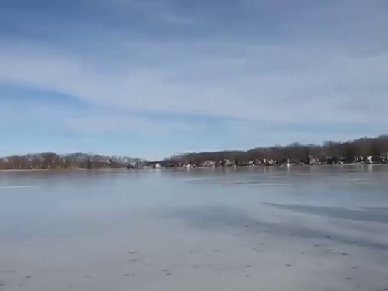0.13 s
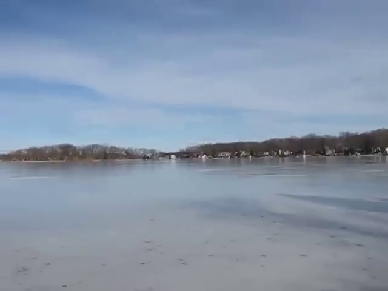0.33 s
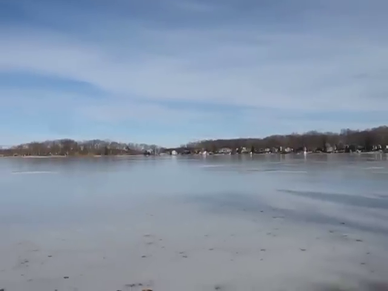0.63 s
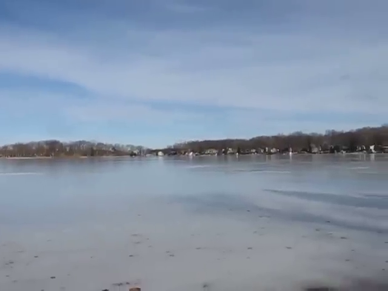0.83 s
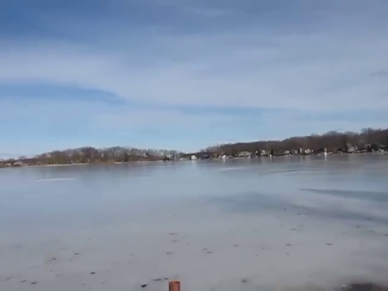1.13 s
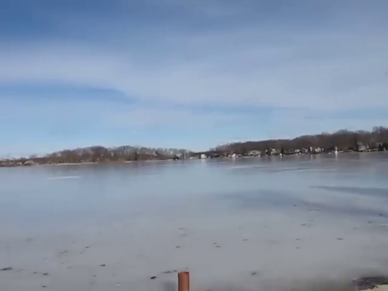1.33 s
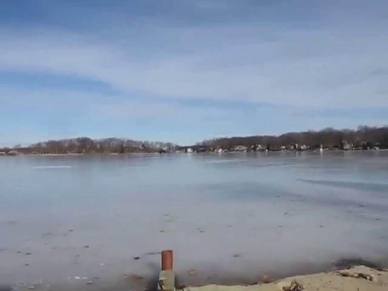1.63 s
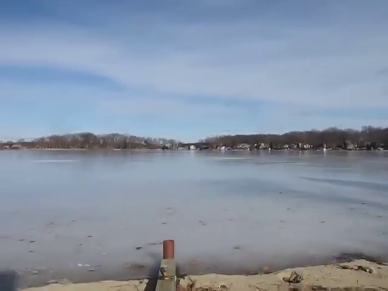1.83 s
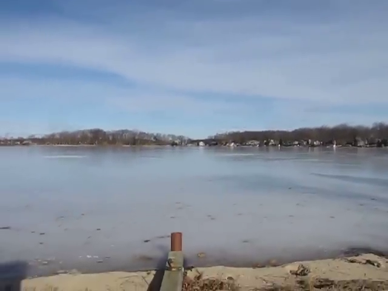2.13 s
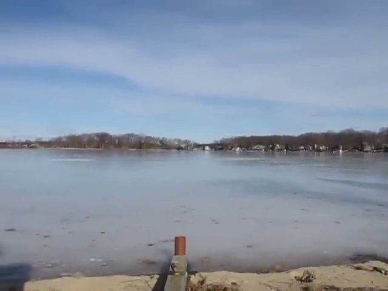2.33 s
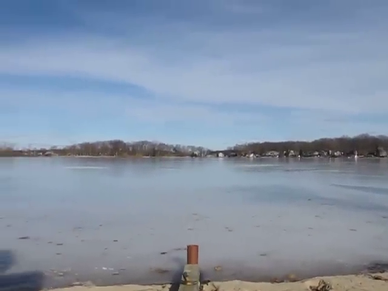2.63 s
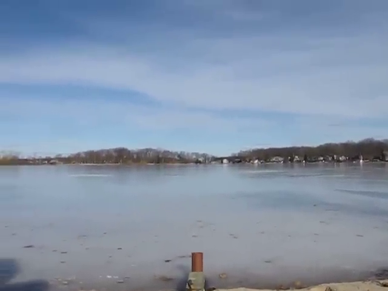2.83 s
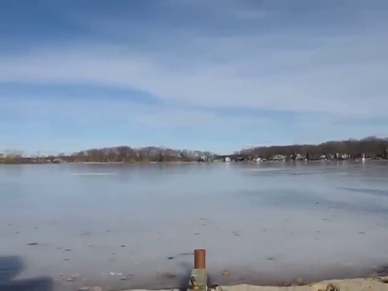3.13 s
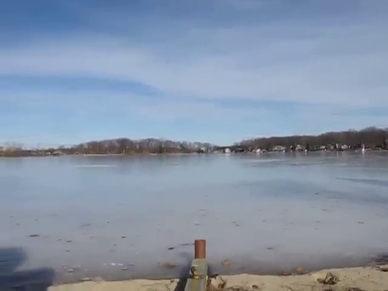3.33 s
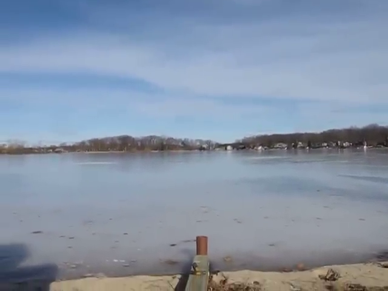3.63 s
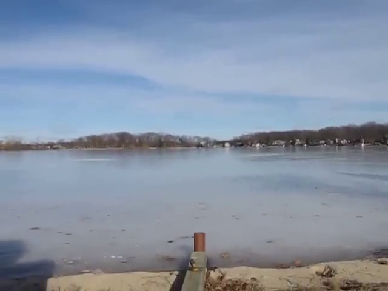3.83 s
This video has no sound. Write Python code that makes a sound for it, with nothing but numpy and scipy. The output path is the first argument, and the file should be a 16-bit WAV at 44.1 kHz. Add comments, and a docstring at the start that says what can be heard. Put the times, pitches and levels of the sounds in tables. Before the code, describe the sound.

Low wind buffeting hits a handheld camera's microphone for a second, then faint handling clicks and creaks

```python
"""On a frozen lake shore a gust buffets the two ports of a hand-held camera while its lens motor whirs.
The body clicks once early on; the gust, turbulent noise, dies away after a second; the ice adds damped
ticks and tinkles. A sleeve rustles as shaped noise, and low gliding blips rise softly from the ice sheet;
past two seconds the grip creaks by stick-slip and the body clicks again. The motor stops after three
seconds, and far traffic swells at the end. Beneath it all lie open-air hush, hiss and an engine drone of
slightly wavering sines that slowly swells and fades."""
import sys
import numpy as np
from scipy import signal
from scipy.fft import rfft, irfft, next_fast_len
from scipy.io import wavfile
from scipy.ndimage import uniform_filter1d, map_coordinates

SR = 44100
rng = np.random.default_rng(int(sys.argv[2]) if len(sys.argv) > 2 else 0)


def wrap_up_sound(samples):
    """Save the sound to the file named by the first command line argument, as 16-bit audio."""
    columns = np.atleast_2d(samples).T
    # keep every value between -1 and 1, then stretch to whole-number steps
    tamed = np.clip(columns, -1, 1)
    steps = np.round(tamed * 32767).astype(np.int16)
    wavfile.write(sys.argv[1], SR, steps)


N = 176400  # samples: 4 s


def amp(db):
    """Level to amplitude: 20 dB is a factor of ten."""
    return 10 ** (np.asarray(db) / 20)


def unit(x):
    """Normalization: scale to an rms of 1 over all channels."""
    return x / np.sqrt(np.mean(x ** 2) + 1e-20)


def clock():
    """Sampling: the time of each sample [s]."""
    return np.arange(N) / SR


def sine(hz, t, phase=0):
    """Simple harmonic motion with an added phase [rad]."""
    return np.sin(2 * np.pi * hz * t + phase)


def along(points, hz):
    """Interpolation of (frequency [Hz], value) points on a logarithmic frequency axis."""
    f, v = np.transpose(points)
    return np.interp(np.log(hz + 1), np.log(f + 1), v)


def curve(points):
    """Linear interpolation of (time [s], value) points, one value per sample."""
    return np.interp(clock(), *np.transpose(points))


def wobble(rate):
    """Band-limited fluctuation: a smooth random curve with rate knots a second."""
    return map_coordinates(rng.standard_normal(8192), [clock() * rate + 4], mode="wrap")


def filtered(x, response):
    """Linear filtering: multiply the spectrum by a response of frequency."""
    m = next_fast_len(N + 8192)
    hz = np.fft.rfftfreq(m, 1 / SR)
    return irfft(rfft(x, m) * response(hz), m)[..., :N]


def rush(spectrum, alike):
    """Partly coherent stereo noise of rms 1; alike is a coherence or (frequency [Hz], coherence) points."""
    def mid_side_gains(hz):
        coherence = along(alike, hz) if np.ndim(alike) else alike + 0 * hz
        angle = np.arccos(np.clip(coherence, -1, 1)) / 2
        return amp(along(spectrum, hz)) * [np.cos(angle), np.sin(angle)]

    mid, side = filtered(rng.standard_normal((2, N)), mid_side_gains)
    return unit(np.array([mid + side, mid - side]))


def band(hz, octaves):
    """Band-pass noise: independent channels around one frequency, joint rms 1."""
    def response(f):
        return 1 / (1 + (np.log2((f + 1) / hz) / octaves) ** 4)

    return unit(filtered(rng.standard_normal((2, N)), response))


def pan(db):
    """Interaural level difference: left and right gains, positive toward the left."""
    return amp([[db / 2], [-db / 2]])


def burst(s, hold, t60, attack=0.0008):
    """Transient envelope: exponential attack, hold, then a release of 60 dB in t60 seconds."""
    t = np.maximum(clock() - s, 0)
    release = np.log(1000) * np.maximum(t - hold, 0) / t60
    return (1 - np.exp(-t / attack)) * np.exp(-np.minimum(release, 40))


def swell(s, length):
    """Gaussian envelope around time s, with length as its standard deviation [s]."""
    return np.exp(-np.minimum(((clock() - s) / length) ** 2 / 2, 40))


def eddies(spectrum, steady_s):
    """Turbulence: noise incoherent between ports, its power evened out over about steady_s."""
    x = rush(spectrum, 0)
    width = max(int(steady_s * SR), 2)
    power = np.abs(signal.hilbert(x)) ** 2 / 2
    for _ in range(2):
        power = uniform_filter1d(power, width, axis=1)
    return unit(x / np.sqrt(np.abs(power) + 0.08))  # the floor keeps lulls from being overamplified


# wind strength at each port: (time [s], relative level [dB])
WIND_LEFT = [(0, -24), (.05, -24), (.09, -30.5), (.2, -26.5), (.29, -24), (.38, -17), (.43, -12),
             (.51, -15.5), (.56, -12), (.7, -16), (.77, -22), (.85, -20.5), (.96, -24), (1.01, -34),
             (1.1, -28), (1.18, -24.5), (1.22, -45), (1.3, -37), (1.45, -47), (4, -65)]
WIND_RIGHT = [(0, -23.5), (.1, -40), (.19, -36.5), (.35, -33.5), (.42, -22), (.52, -18.5), (.59, -20),
              (.66, -20.5), (.77, -21.5), (.91, -29.5), (.97, -28.5), (1.12, -32), (1.17, -49),
              (1.45, -54.5), (4, -60)]
# spectra of the low rumble and the higher flapping: (frequency [Hz], relative density [dB per Hz])
RUMBLE_SPECTRUM = [(15, -7.5), (35, 1.5), (60, 3), (100, -4.5), (150, -19), (250, -21.5), (400, -53),
                   (1000, -72), (3000, -84)]
FLAP_SPECTRUM = [(40, -26.5), (90, -3), (130, 0.5), (165, -0.5), (230, -11), (320, -15.5), (450, -26),
                 (700, -34.5), (1200, -48), (2500, -79), (6000, -83)]
# single buffets within the gust: (time [s], rumble change [dB], flapping change [dB])
BUFFETS = [(.235, 5, 0), (.357, 0, 5), (.41, 3, -2), (.443, 0, 5), (.55, 1, 4), (.6, 2, -4), (.652, 3, 1),
           (.71, 3, 2), (.745, 0, 11), (.8, 0, 9), (1.135, 4, 7)]
BUFFET_S = 0.012
RUMBLE_DB, FLAP_DB = -0.5, -4.5
FLAP_PIVOT_DB, FLAP_GROWTH = -13.5, 2.04  # growth in dB per dB of wind strength, about the pivot


def wind():
    """Nonlinear flow noise: flapping grows faster than rumble; each buffet reshapes one or both."""
    strength_db = np.array([curve(WIND_LEFT), curve(WIND_RIGHT)])
    rumble_change_db = sum(change * swell(s, BUFFET_S) for s, change, _ in BUFFETS)
    flap_change_db = sum(change * swell(s, BUFFET_S) for s, _, change in BUFFETS)
    flutter_db = 2.7 * np.array([wobble(110.3), wobble(109.6)])
    rumble_db = strength_db + rumble_change_db + RUMBLE_DB
    flap_db = FLAP_PIVOT_DB + FLAP_GROWTH * (strength_db - FLAP_PIVOT_DB)
    flap_db = flap_db + flap_change_db + flutter_db + FLAP_DB
    rumble = amp(rumble_db) * eddies(RUMBLE_SPECTRUM, steady_s=0.027)
    flapping = amp(flap_db) * eddies(FLAP_SPECTRUM, steady_s=0.029)
    return rumble + flapping


# running of the whir: (time [s], relative level [dB])
MOTOR_RUN = [(0, 1), (1.5, 1), (2.95, 1.5), (3.05, -8), (4, -46)]
# spectra of the whir and the gear chatter: (frequency [Hz], relative density [dB per Hz])
WHIR_SPECTRUM = [(150, -35), (350, 11.5), (460, -3), (700, 4.5), (1000, 0.5), (1350, -0.5), (1900, -15),
                 (3000, -20), (6000, -28), (15000, -55)]
CHATTER_SPECTRUM = [(1500, -24), (2700, -11), (3200, 5), (3900, -13), (5100, -2.5), (6500, -12),
                    (14000, -36)]
# chatter strength before modulation and panning: (time [s], level [dB])
CHATTER_LEVEL = [(0, -59.5), (.4, -69), (.8, -68), (1.05, -69.5), (1.3, -67), (2.2, -69.5), (3, -74),
                 (3.5, -71), (4, -81)]
# faint motor tones: (start [s], end of hold [s], frequency [Hz], mean level [dB])
MOTOR_TONES = [(-.1, 1.48, 657, -59.5), (.95, 2.3, 355.7, -57.5), (.95, 1.55, 386.6, -60)]
WHIR_DB = -56
CHATTER_HZ, CHATTER_PEAK_S, CHATTER_DEPTH = 22.65, 0.0085, 0.56


def lens_motor():
    """Amplitude modulation: rough whir and wavering tones, with gear chatter that swells once a turn."""
    t = clock()
    whir = amp(WHIR_DB + curve(MOTOR_RUN) + 2.5 * wobble(60)) * rush(WHIR_SPECTRUM, 0.79)
    turn = 1 + CHATTER_DEPTH * np.cos(2 * np.pi * CHATTER_HZ * (t - CHATTER_PEAK_S))
    # negative coherence: the two channels partly oppose each other
    chatter = amp(curve(CHATTER_LEVEL)) * turn * rush(CHATTER_SPECTRUM, -0.37) * pan(db=-4.5)
    tones = np.zeros(N)
    for start, end, hz, db in MOTOR_TONES:
        envelope = burst(start, end - start, t60=0.42, attack=0.019)
        tones += amp(db + 3.4 * wobble(3.1)) * envelope * sine(hz, t, 0.3 * wobble(16))
    return whir + chatter + tones


# slips of the grip:
# (time [s], relative level [dB], frequency [Hz], nominal length [s], grit level over the tone [dB])
CREAKS = [(2.2185, -43, 1570, .005, -12), (2.3105, -44, 1550, .004, -20), (2.3152, -31, 1680, .003, -28),
          (2.319, -33, 1620, .005, -26), (2.3265, -41, 1500, .002, -12), (2.336, -33, 1330, .005, -25),
          (2.3408, -35, 1400, .004, -12), (2.3478, -32, 1400, .003, -17), (2.3522, -30.5, 1520, .004, -23),
          (2.3586, -34, 1100, .003, -10), (2.3665, -42, 1400, .003, -22), (2.3708, -37, 1600, .003, -26),
          (2.3744, -33, 1550, .004, -27), (2.3815, -40, 1550, .002, -16), (2.428, -42, 1260, .004, -20),
          (2.4375, -42, 1600, .002, -14), (2.445, -44, 1550, .005, -22), (2.555, -39, 1560, .005, -24),
          (2.5615, -41, 1600, .004, -24), (2.655, -41, 1590, .005, -22), (2.674, -46, 1550, .004, -22),
          (2.7098, -41, 1540, .005, -22), (2.733, -45, 1500, .004, -22), (2.7485, -36, 1540, .005, -26),
          (2.7925, -42, 1520, .003, -22), (2.803, -38.5, 1530, .005, -24), (2.9505, -40, 1520, .005, -24),
          (2.973, -46, 1480, .005, -20)]
# dull body and bright crack of small solid knocks, also played by the ice,
# then the rattling case: (frequency [Hz], relative density [dB per Hz])
KNOCK_BODY = [(200, -8), (600, 6.5), (1000, 5), (1450, 0), (2100, -36), (6000, -56)]
KNOCK_CRACK = [(800, -20), (2000, 2), (3300, 6), (4500, -7), (7000, -16), (15000, -28)]
RATTLE_SPECTRUM = [(200, -12), (450, 2), (950, 3.5), (1300, 0), (1900, 4), (2600, -15), (3600, -21),
                   (4600, -29), (12000, -42)]
CREAK_DB, CREAK_KNOCK_DB, CREAK_PAN_DB = 0.5, -13, 2
CREAK_ATTACK_S, CREAK_T60_S, CREAK_HOLD = 0.0008, 0.007, 0.8  # hold: share of the nominal length
CREAK_ROUGH_RAD = 0.42  # scales the random phase
RATTLE_DB, RATTLE_T60_S = -23, 0.083


def creaks():
    """Stick-slip friction: each slip sings briefly near a resonance, with knock, grit and case rattle."""
    tone, grip, grit, rattle = np.zeros((4, N))
    for s, db, hz, length, grit_db in CREAKS:
        slip = burst(s, length * CREAK_HOLD, CREAK_T60_S, attack=CREAK_ATTACK_S)
        envelope = amp(db + CREAK_DB) * slip
        tone += envelope * sine(hz, clock() - s, CREAK_ROUGH_RAD * wobble(700))
        grip += envelope
        grit += amp(grit_db) * envelope
        rattle += amp(db + RATTLE_DB) * burst(s, 0, RATTLE_T60_S)
    rough_tone = tone * amp(0.72 * wobble(600))
    gritty = grit * rush(KNOCK_CRACK, 0.2)
    knock = amp(CREAK_KNOCK_DB) * grip * rush(KNOCK_BODY, 1.0)
    return (rough_tone + gritty + knock) * pan(db=CREAK_PAN_DB) + rattle * rush(RATTLE_SPECTRUM, 0.6)


# clicks of the camera body, levels before panning:
# (time [s], snap level [dB], thump level before doubling [dB], left over right [dB])
CLICKS = [(0.497, -45, -59, -2), (2.7178, -41.5, -28.5, -8.5), (2.825, -47.5, -48, -9.5)]
# bright snap: (frequency [Hz], relative density [dB per Hz])
SNAP_SPECTRUM = [(300, -4), (1000, 0), (2500, 2), (4500, -1.5), (7500, -8), (11000, -13.5), (15000, -14)]
SNAP_HOLD_S, SNAP_T60_S = 0.0035, 0.012
THUMP_HZ, THUMP_T60_S = 780, 0.0045


def clicks():
    """Impact excitation: a heavily damped sine thumps together with a short bright noise snap."""
    out, noise = np.zeros((2, N)), rush(SNAP_SPECTRUM, 0.041)
    for s, snap_db, thump_db, pan_db in CLICKS:
        thump_envelope = burst(s, 0, THUMP_T60_S, attack=0.0001)
        thump = 2 * amp(thump_db) * thump_envelope * sine(THUMP_HZ, clock() - s)
        snap = amp(snap_db) * burst(s, SNAP_HOLD_S, SNAP_T60_S) * noise
        out += pan(db=pan_db) * (thump + snap)
    return out


# cloth noise: (frequency [Hz], relative density [dB per Hz])
RUSTLE_SPECTRUM = [(300, -4), (1000, -3), (2000, -2), (4500, -1.5), (7000, -4.5), (11000, -10),
                   (15500, -15)]
# strength of the rustle: (time [s], mean level [dB])
RUSTLE_LEVEL = [(0, -74), (.8, -73), (1.02, -65), (1.45, -65), (1.65, -59.5), (1.87, -61), (2.05, -65.5),
                (2.2, -63.5), (2.55, -70.5), (3.1, -77), (4, -80)]
# quick brushes: (centre [s], standard deviation [s], level [dB], centre frequency [Hz], width [octaves])
BRUSHES = [(.678, .016, -52, 4200, .6), (.668, .022, -63, 10000, .5)]


def sleeve():
    """Friction noise: cloth gives a grainy wide-band rustle with a few quick band-pass brushes."""
    rustle = amp(curve(RUSTLE_LEVEL) + 1.4 * wobble(250)) * rush(RUSTLE_SPECTRUM, 0.056)
    brushes = sum(amp(db) * swell(s, length) * band(hz, octaves) for s, length, db, hz, octaves in BRUSHES)
    return rustle + brushes


# dry ticks: (time [s], knock level [dB], knock frequency [Hz], bright crack level [dB])
TICKS = [(.893, -46, 1250, -55), (1.04, -42, 1300, -55), (1.192, -38, 1300, -58), (1.529, -40, 1150, -54),
         (1.593, -37, 1050, -51), (1.599, -43, 1400, -46), (1.694, -36, 1050, -52), (1.756, -48, 1500, -47),
         (1.768, -37, 1050, -60), (1.891, -43, 1200, -60), (1.911, -40, 1000, -49), (2.091, -34, 1050, -54)]
# low blips of the sheet: (centre [s], standard deviation [s], level [dB], frequency at centre [Hz])
BLIPS = [(1.857, 0.056, -48, 257), (2.137, 0.065, -52, 271.6), (2.266, 0.072, -55.5, 259.4),
         (2.66, 0.042, -50.5, 214), (2.799, 0.04, -52.5, 265), (3.124, 0.051, -45, 262.6),
         (3.747, 0.057, -47.5, 272), (3.78, 0.032, -45.5, 212.3)]
# tiny high ticks of ice crystals: (time [s], level [dB], centre frequency [Hz])
TINKLES = [(1.223, -52, 10500), (1.378, -58, 9700), (1.697, -58, 6200), (2.98, -55, 5400),
           (3.414, -53, 9900)]
TICK_T60_S, TICK_RING_T60_S, TICK_SCUFF_DB = 0.026, 0.018, -2.5  # scuff level over the knock
BLIP_GLIDE_HZ_PER_S, BLIP_ROUGH_RAD = 123, 0.75
TINKLE_T60_S, TINKLE_OCTAVES = 0.032, 0.3


def ice():
    """Damped resonance and gliding tones: dry ticks and tinkles die fast; wavering low blips rise in pitch."""
    knock, scuff, crack, blips = np.zeros((4, N))
    for s, db, hz, crack_db in TICKS:
        knock += amp(db) * burst(s, 0, TICK_RING_T60_S) * sine(hz, clock() - s)
        envelope = burst(s, 0, TICK_T60_S, attack=0.00049)
        scuff += amp(db + TICK_SCUFF_DB) * envelope
        crack += amp(crack_db) * envelope
    for s, length, db, hz in BLIPS:
        t = clock() - s
        mean_hz = hz + BLIP_GLIDE_HZ_PER_S * t / 2  # half the glide, since phase integrates frequency
        blips += amp(db) * swell(s, length) * sine(mean_hz, t, BLIP_ROUGH_RAD * wobble(50))
    tinkles = np.zeros((2, N))
    for s, db, hz in TINKLES:
        tinkles += amp(db) * burst(s, 0, TINKLE_T60_S, attack=0.002) * band(hz, TINKLE_OCTAVES)
    ticks = knock + scuff * rush(KNOCK_BODY, 0.95) + crack * rush(KNOCK_CRACK, 0.2024)
    return ticks + tinkles + blips


# spectra of hush, far traffic and microphone hiss: (frequency [Hz], relative density [dB per Hz])
HUSH_SPECTRUM = [(20, -4.5), (45, 0), (65, 2.5), (120, 1.5), (170, -6.5), (270, -7.5), (340, -16),
                 (450, -17.5), (800, -17.5), (1100, -23.5), (1700, -33), (2500, -45), (6000, -62)]
TRAFFIC_SPECTRUM = [(300, -21), (600, -2), (780, -1.5), (1000, -7.5), (1600, -33), (4000, -57)]
HISS_SPECTRUM = [(300, 0), (2000, 0.5), (3200, -0.5), (5000, -3.5), (10000, -8), (15500, -15)]
# left-right likeness of the hush: (frequency [Hz], coherence [-1 to 1])
HUSH_COHERENCE = [(30, 0.88), (80, 0.94), (400, 0.97), (1000, 0.75), (2000, 0.39), (4000, .1)]
# strength of the traffic: (time [s], level [dB])
TRAFFIC_LEVEL = [(0, -84), (3.35, -66), (3.65, -57), (4, -57)]
# engine partials: (frequency [Hz], mean level before the swell [dB])
ENGINE_PARTIALS = [(43, -51.5), (60, -64.5), (86.1, -40.5)]
# swell of the engine: (time [s], gain [dB])
ENGINE_SWELL = [(0, -9), (1.3, 2), (1.8, 2), (2.6, -0.5), (3.4, 1), (3.65, -5.5), (4, -10)]
HUSH_DB, HISS_DB = -43.5, -61


def background():
    """Superposition: diffuse hush, coherent far traffic, wavering engine partials and incoherent hiss."""
    hush = amp(HUSH_DB + 0.61 * wobble(6.84)) * rush(HUSH_SPECTRUM, HUSH_COHERENCE)
    traffic = amp(curve(TRAFFIC_LEVEL)) * rush(TRAFFIC_SPECTRUM, 1.0)
    drone = np.zeros(N)
    for hz, db in ENGINE_PARTIALS:
        drone += amp(db + 0.5 * wobble(12)) * sine(hz, clock(), 0.33 * wobble(7.2))
    engine = amp(curve(ENGINE_SWELL)) * drone
    hiss = amp(HISS_DB) * rush(HISS_SPECTRUM, 0)
    return hush + traffic + engine + hiss


def scene():
    """Linear superposition: all sources add at the two ports."""
    return wind() + lens_motor() + creaks() + clicks() + sleeve() + ice() + background()


TOP_HZ = 15750


def record(dry):
    """Band limitation: the camera keeps nothing at or above its upper frequency limit."""
    return filtered(dry, lambda hz: hz < TOP_HZ)


dry = scene()
out = record(dry)
wrap_up_sound(out)
```